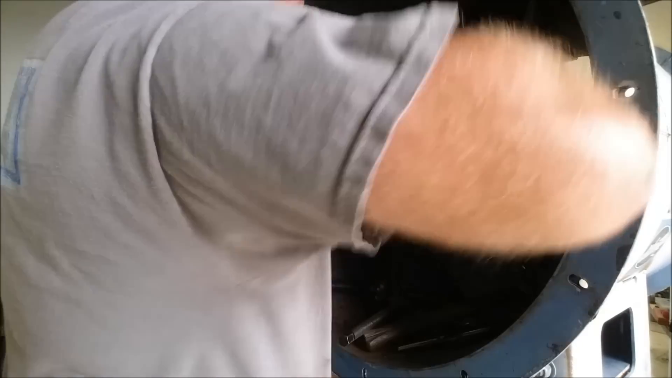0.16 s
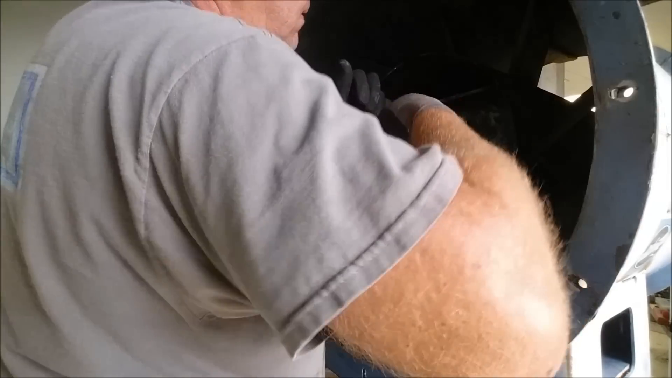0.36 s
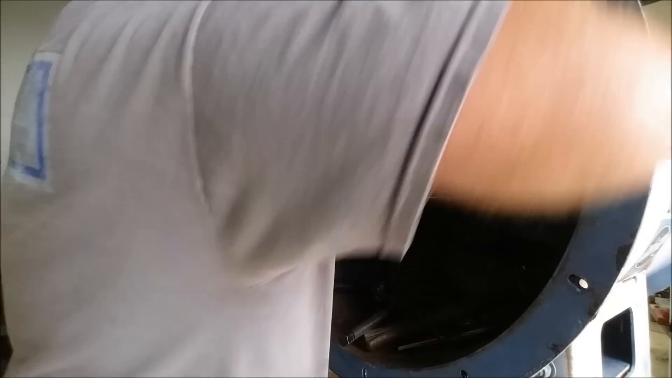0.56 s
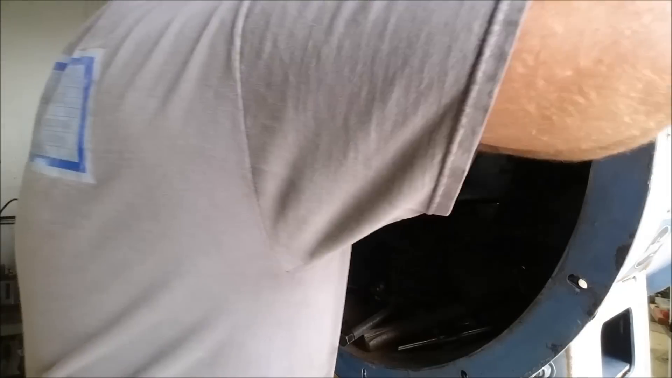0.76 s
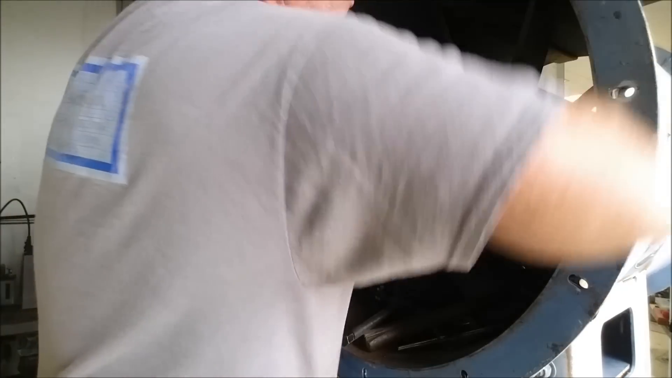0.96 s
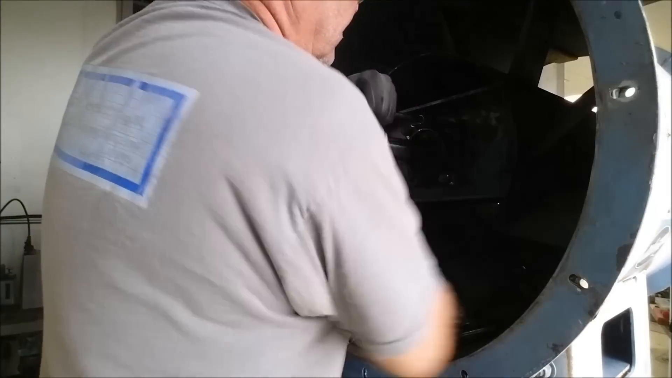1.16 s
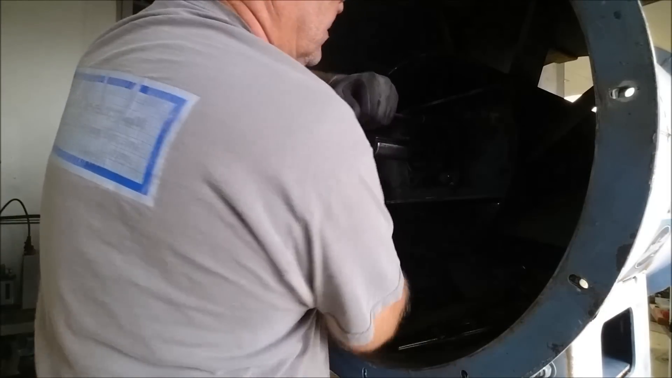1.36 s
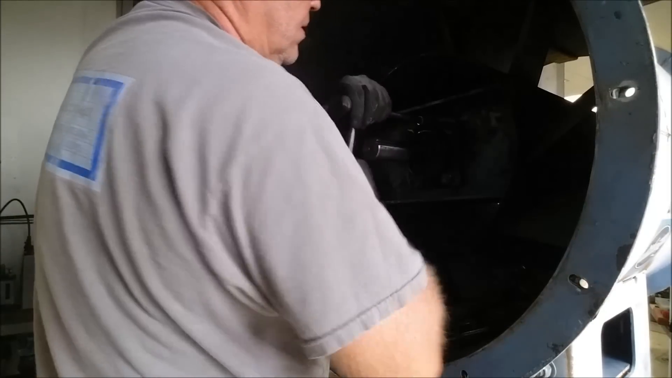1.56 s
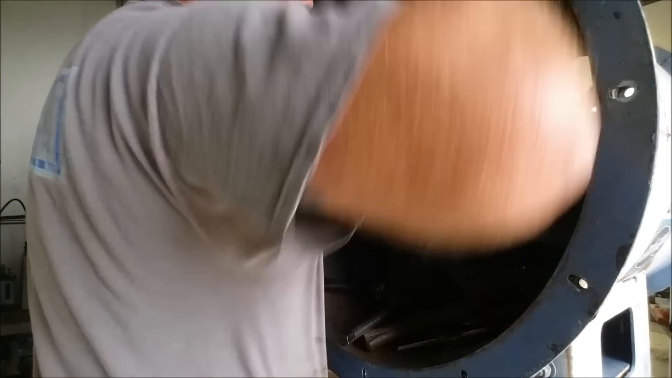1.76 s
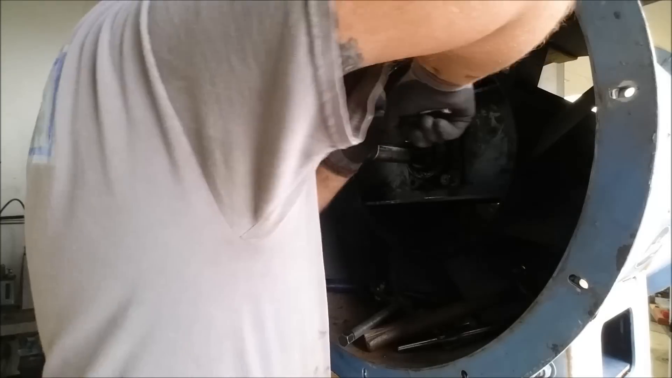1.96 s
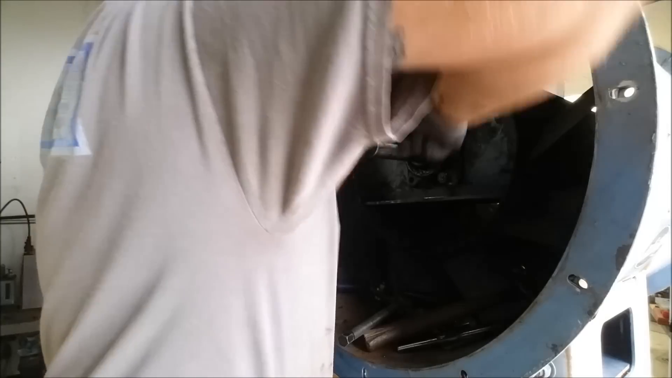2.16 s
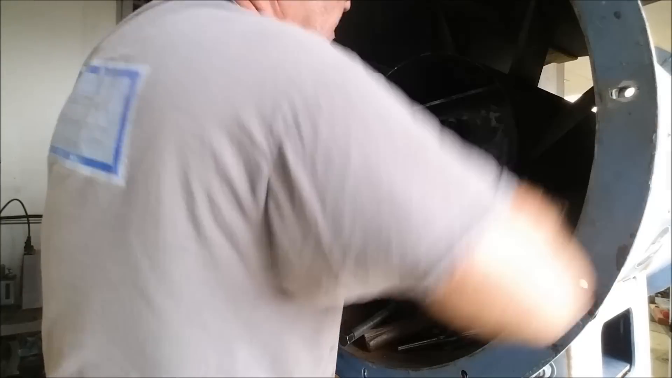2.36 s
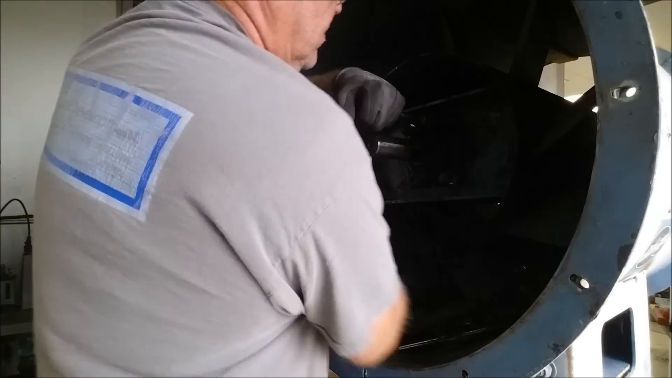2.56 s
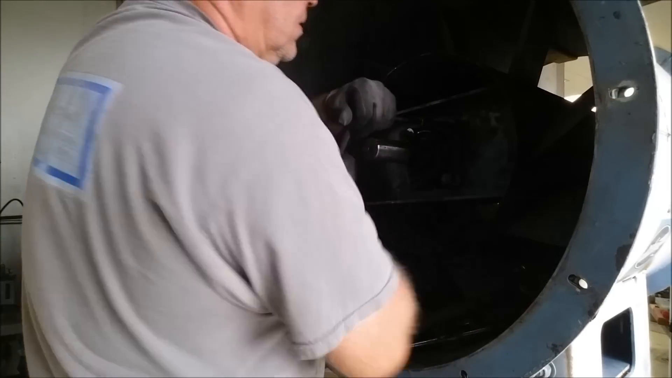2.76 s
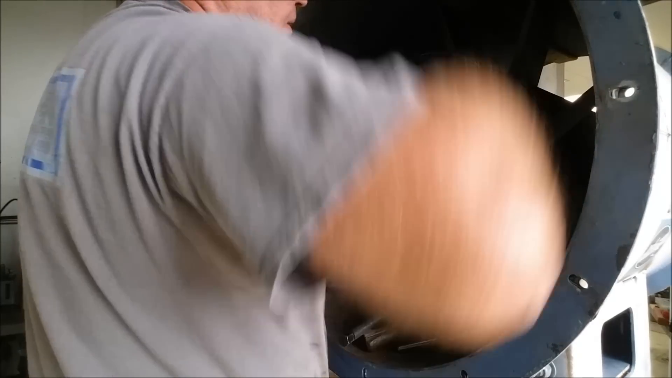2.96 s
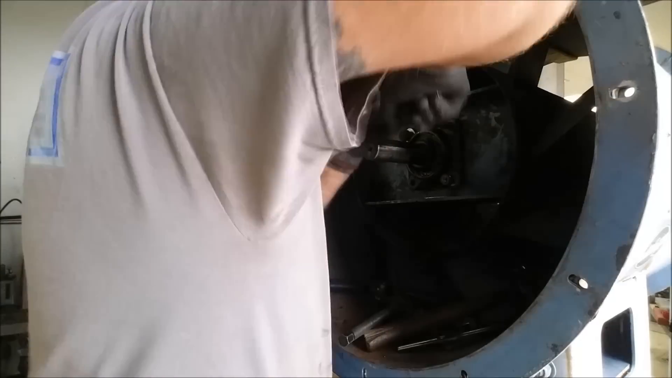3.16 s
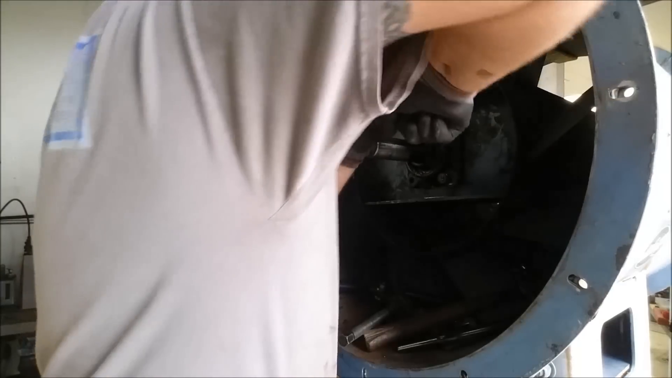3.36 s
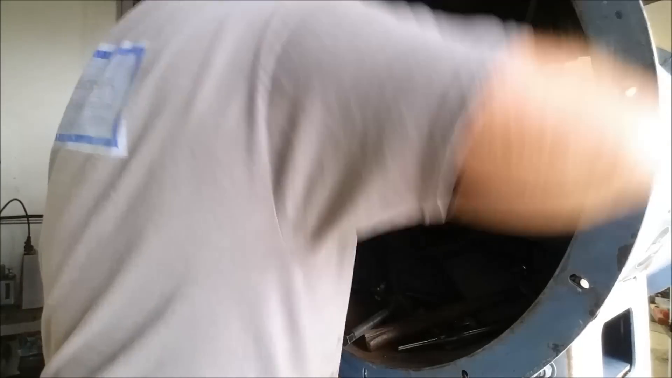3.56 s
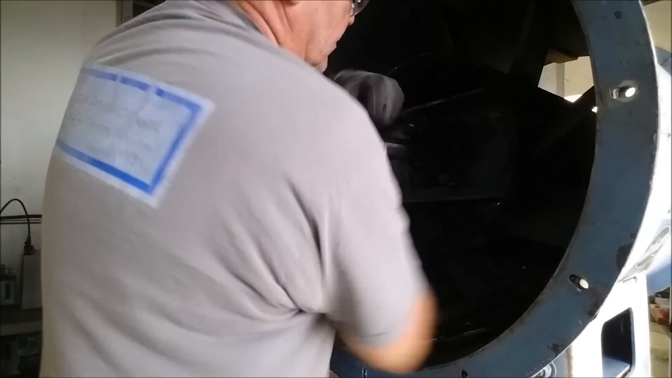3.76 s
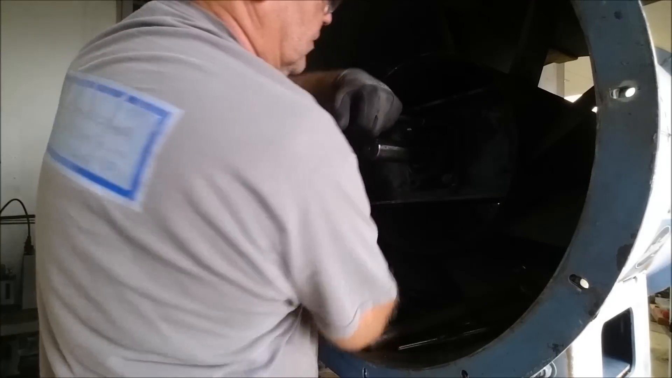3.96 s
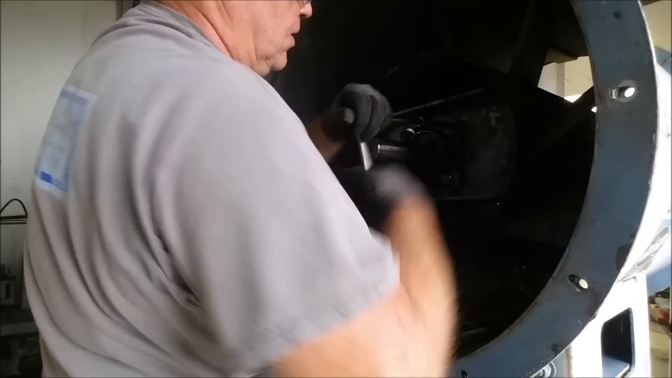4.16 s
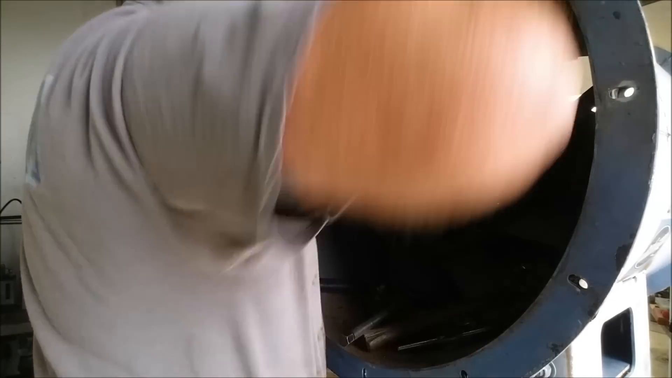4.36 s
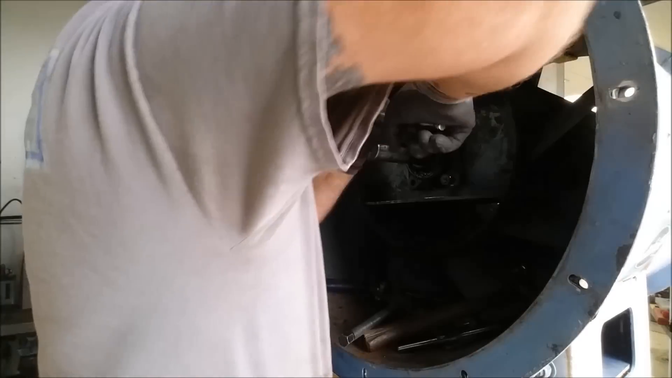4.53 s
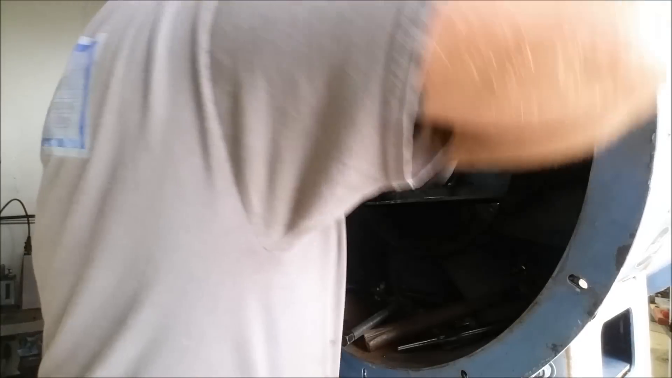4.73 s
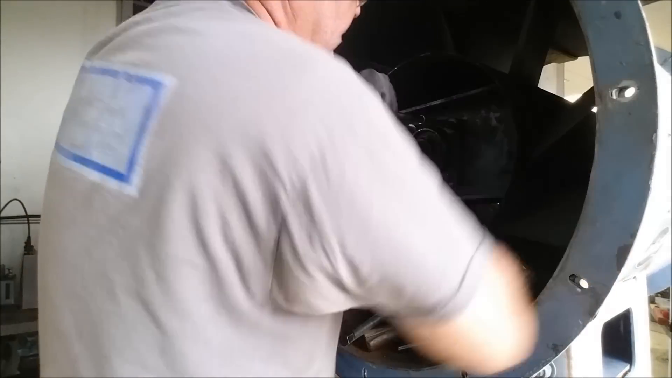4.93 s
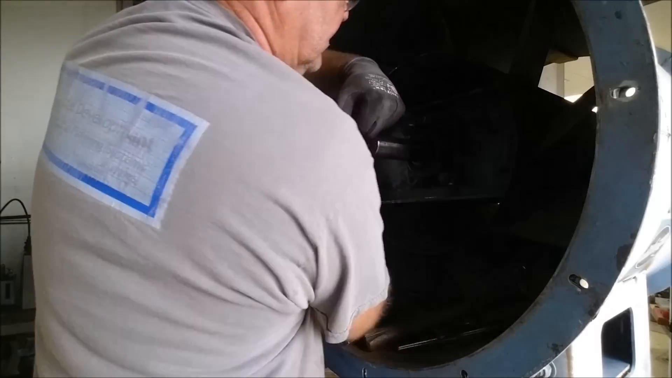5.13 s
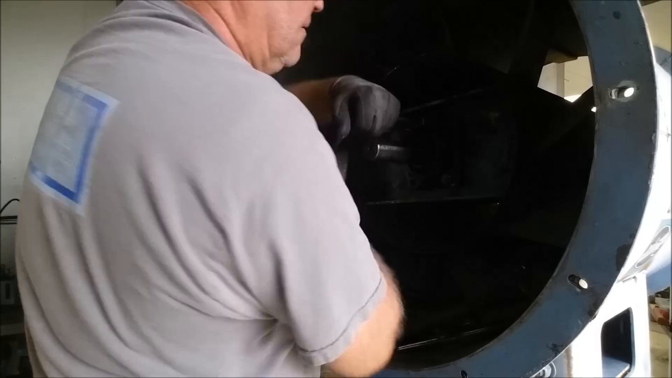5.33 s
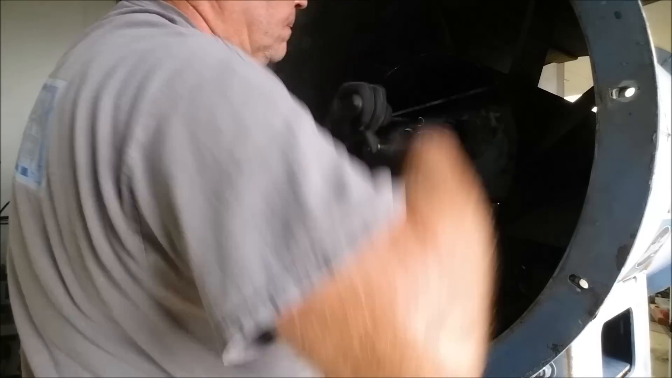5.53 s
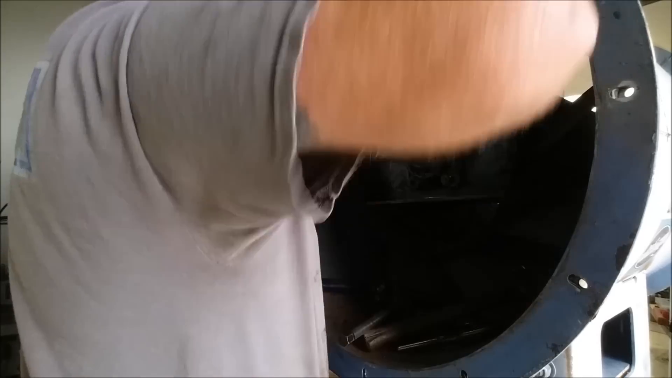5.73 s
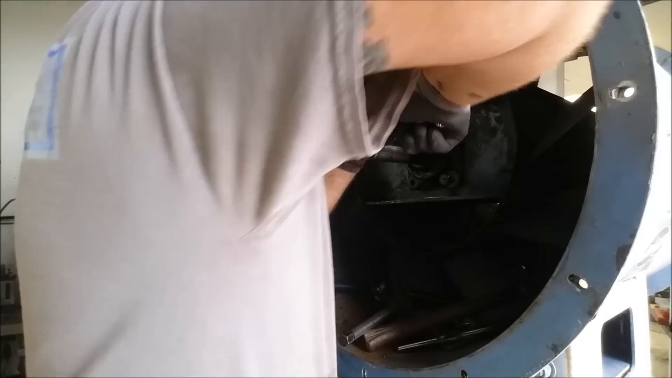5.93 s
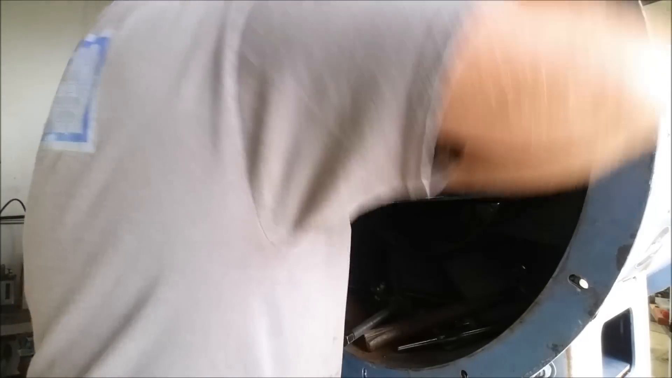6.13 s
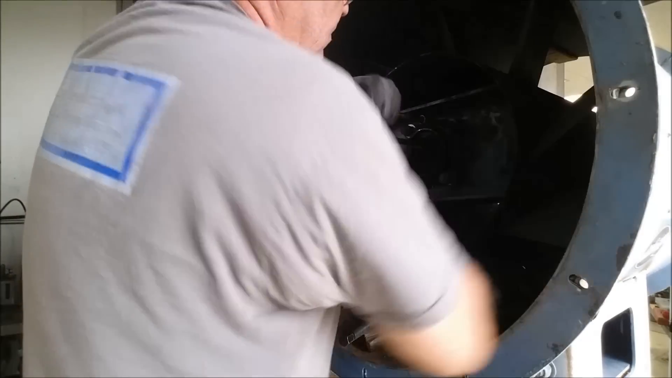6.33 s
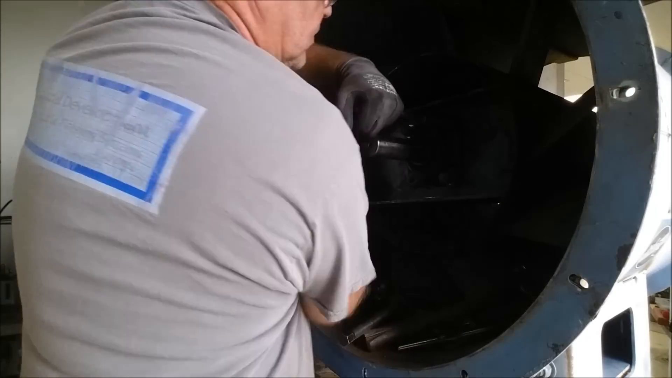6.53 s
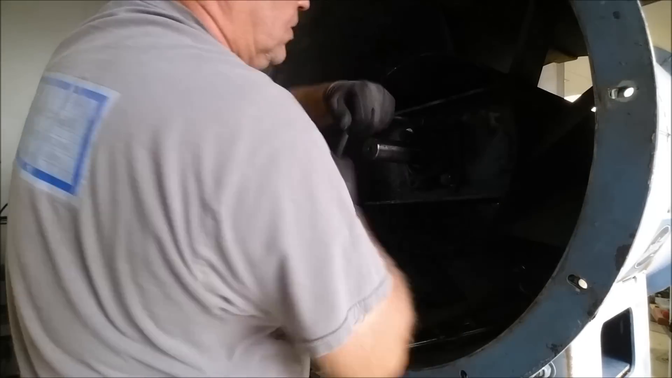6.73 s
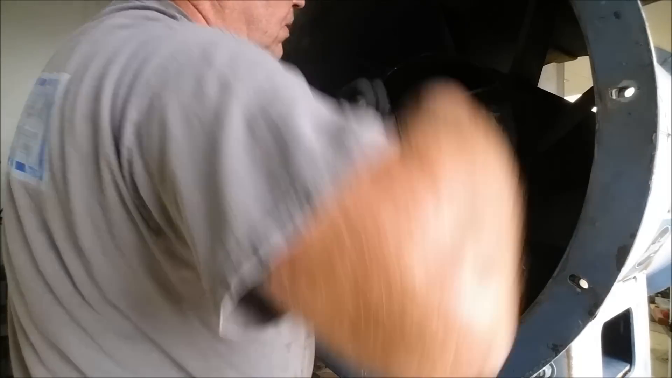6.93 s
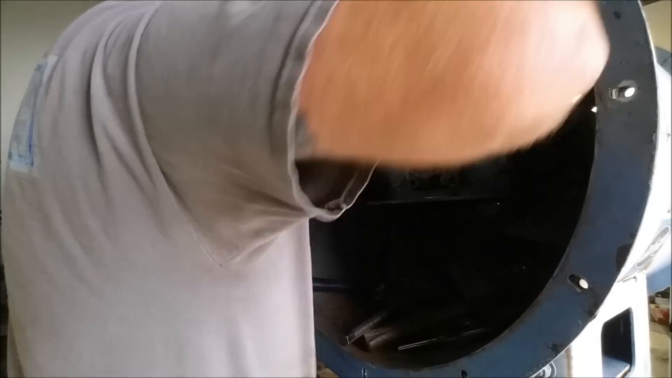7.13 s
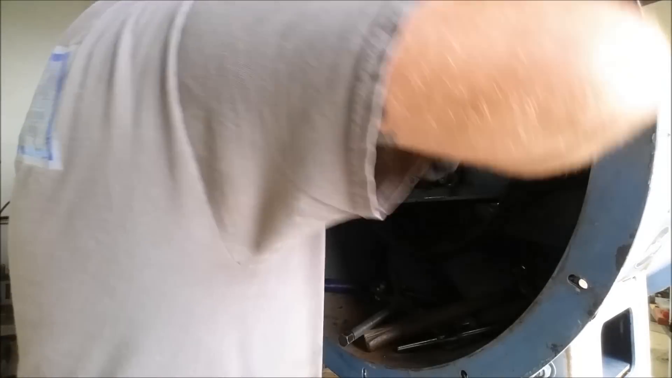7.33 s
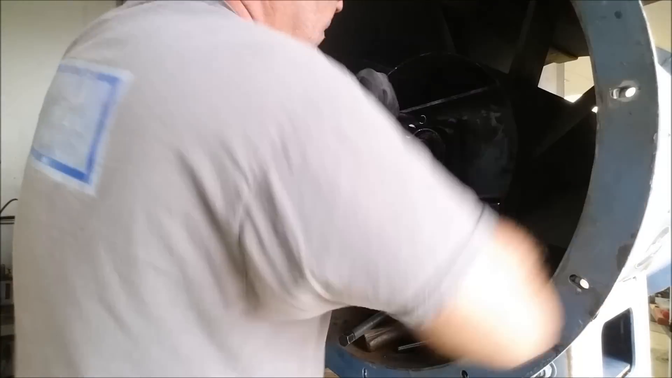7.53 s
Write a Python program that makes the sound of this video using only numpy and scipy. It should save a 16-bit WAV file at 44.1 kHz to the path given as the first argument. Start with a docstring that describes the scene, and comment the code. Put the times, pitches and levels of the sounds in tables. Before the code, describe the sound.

A ratchet wrench works in a hollow iron shell: grinding pulls, booming metallic knocks, then quick runs of bright clicks, over and over.

```python
"""In a workshop, inside a large hollow iron shell, a tap is worked into cast iron with a ratchet wrench.
At the ends of strokes the slack is taken up with knocks: noise bursts, shaped by the shell's modes, that boom and die.
Pulls grind as filtered noise of uneven level; on the return the pawl clicks over its teeth as resonated bursts.
The steel handle sings one thin high sine and the wrench head shimmers as narrow noise.
Low thuds, a rumble and steady room tone lie beneath."""
import sys
import numpy as np
from scipy import signal
from scipy.fft import rfft, irfft, next_fast_len
from scipy.io import wavfile
from scipy.ndimage import map_coordinates

SR = 44100
rng = np.random.default_rng(int(sys.argv[2]) if len(sys.argv) > 2 else 0)


def store_wav(level_fs):
    """Save 16-bit WAV to argv[1]."""
    pcm = np.round(np.clip(np.atleast_2d(level_fs), -1, 1) * 32767)
    wavfile.write(sys.argv[1], SR, pcm.T.astype(np.int16))


N = 339129

# Steady room tone: frequency_hz, relative_density_db (per Hz)
ROOM_SPECTRUM = [(15, -23), (25, -4), (127, -41), (161, -9), (384, -3), (451, -8.5), (3620, -22),
                 (3920, -17), (6560, -33.5), (16000, -43)]
# Low rumble: frequency_hz, relative_density_db (per Hz)
RUMBLE_SPECTRUM = [(20, -18), (50, -4), (72, 2.5), (90, 9), (105, -1), (150, 7.5), (190, -36)]
# Likeness of the two ports: frequency_hz, correlation (no unit)
PORT_LIKENESS = [(60, 0.91), (150, 0.95), (380, 0.96), (950, 0.43), (2380, 0.16), (5980, 0.074),
                 (15000, 0.01)]
# Tilt between the microphone ports: frequency_hz, left_minus_right_db
PORT_TILT = [(60, 1.5), (180, -0.5), (550, 0), (1650, -1.5), (4970, -1.5), (15000, 10)]
# Soft low notes: start_s, pitch_hz, level_db, length_s
LOW_THUDS = [(4.175, 88.4, -36.5, 0.13), (1.8, 80, -45, 0.069), (7.7, 95, -38, 0.088),
             (7.48, 83, -50.5, 0.069)]
# Ringings of the wrench head after some knocks: start_s, level_db, t60_s
HEAD_SHIMMERS = [(1.0, -44.5, 0.6), (2.275, -54, 0.51), (3.58, -34, 0.51), (4.12, -54, 0.55),
                 (5.423, -23.5, 0.6), (6.176, -41, 0.73)]
# Close modes of the wrench head: frequency_hz, width_hz, relative_level_db
HEAD_MODES = [(5050, 260, 0), (5510, 220, 1), (5680, 120, -9)]
# Moments that set the handle ringing: start_s, level_db, t60_s
HANDLE_RINGS = [(1.583, -34.5, 0.47), (2.862, -43, 0.82), (2.96, -45, 0.47), (3.59, -50, 0.73),
                (4.12, -59, .5), (4.845, -56, 0.73), (5.423, -46, .8), (5.66, -69, 0.59), (6.77, -62, .7),
                (7.0, -62, 0.9)]
# Pawl snapping over teeth: start_s, level_db, treble_db
TOOTH_CLICKS = [(0.0271, -32.5, -3), (0.0534, -31.5, -6), (0.0807, -31, -7), (0.1115, -32.5, -10),
                (0.174, -34, -6.5), (1.727, -33, -8), (1.7618, -28, -9), (1.7933, -29, -13),
                (1.8232, -28, -13), (1.8512, -29.5, -11), (1.8818, -30, -14), (1.932, -31.5, -10),
                (2.9686, -30.5, -4), (2.9994, -28, -8), (3.0283, -31, -7), (3.0614, -28, -12),
                (3.089, -27, -11.5), (3.1189, -28.5, -15), (3.1522, -33.5, -11), (3.2101, -34, -16),
                (4.223, -28, -13), (4.2542, -28.5, -12), (4.286, -27.5, -15), (4.315, -26.5, -13),
                (4.3432, -30.5, -4), (4.371, -31, -13), (4.3977, -30.5, -11), (4.4467, -32.5, -6.5),
                (5.5626, -25.5, -17), (5.6004, -29, -11), (5.6342, -28, -13), (5.6643, -28, -11),
                (5.691, -23, -19), (5.7224, -26.5, -15), (5.751, -30, -15.5), (5.7866, -34.5, -9),
                (6.9257, -29.5, -11), (6.9575, -31.5, -7), (6.993, -31.5, -7), (7.028, -24.5, -14),
                (7.0599, -29, -7), (7.0903, -31.5, -8), (7.1267, -32.5, -10)]
# Pawl seating just before a knock: start_s, level_db
PAWL_SEATINGS = [(4.096, -46), (5.395, -34), (6.726, -44)]
# Nominal pawl resonances, scattered afresh at each tooth: frequency_hz, width_hz, relative_level_db
PAWL_MODES = [(2650, 600, 5), (3160, 530, 4), (4330, 120, 17), (6240, 3100, 1), (8100, 520, 12.5),
              (10900, 3700, 1.5), (13100, 1000, 4)]
# The shell's answer to the pawl: frequency_hz, relative_density_db (per Hz)
PAWL_ANSWER_SPECTRUM = [(800, -11), (2200, 4), (3300, -4.5), (4300, 8), (5500, -1.5), (9000, -0.5),
                        (16000, -9.5)]
# Stretches of grinding (pulls, returns and brief load-ups before knocks):
# start_s, length_s, drone_db, groan_db, rasp_db
WRENCH_STROKES = [(0.0, 0.16, -57, -50.5, -47.5), (0.434, 0.12, -56, -55.5, -73),
                  (0.97, 0.024, -60, -49, -54), (1.115, 0.25, -46, -50, -44.5), (1.478, 0.1, -52, -54, -57),
                  (1.693, 0.38, -48.5, -45, -50), (2.344, 0.36, -45.5, -46, -41.5),
                  (2.986, 0.31, -56.5, -50, -46), (3.669, 0.27, -36, -43, -39.5),
                  (4.244, .36, -53.5, -48.5, -59), (4.952, 0.26, -45.5, -46.5, -43),
                  (5.544, 0.44, -57, -48.5, -49), (6.243, 0.37, -41.5, -45, -41.5),
                  (6.72, 0.032, -47, -45, -44.5), (6.843, 0.27, -61, -45.5, -48),
                  (7.207, 0.12, -56, -55, -64), (7.603, .3, -39.5, -45.5, -45)]
# Lowest shell modes under load: frequency_hz, width_hz, relative_level_db
DRONE_MODES = [(217.6, 6.3, -7), (251, 18, -17.5), (166.8, 8.8, -18)]
# Groan of the shell: frequency_hz, relative_density_db (per Hz)
GROAN_SPECTRUM = [(160, -52), (280, 5.5), (311, -9), (458, 4), (738, -34), (809, -7.5), (1500, -15.5),
                  (1950, -51), (3300, -120)]
# Peaks that stand on the groan: frequency_hz, width_hz, level_over_groan_db
GROAN_MODES = [(366, 18, -15), (501, 11, 12), (850, 80, 9), (955, 17, -5), (1324, 70, 6.5)]
# Rasp of the thread: frequency_hz, relative_density_db (per Hz)
RASP_SPECTRUM = [(590, -1), (1000, 2.5), (1100, -3), (1520, -2.5), (2450, -4), (2660, -10), (4160, -14.5),
                 (6230, -25.5), (12000, -42.5), (15600, -74), (22000, -120)]
# Knocks, coloured by where the blow lands: start_s, level_db, boom_db, clank_db, treble_db, decay_factor (no unit)
SHELL_KNOCKS = [(0.261, -43, 1.5, 0, -1.5, 0.59), (0.332, -29, -8.5, 1, 8, 0.75),
                (0.475, -43.5, 10.5, 12, 10.5, 0.77), (0.988, -37.5, 10, 7, 13, 0.82),
                (1.47, -56, 6, -11, -13, 0.76), (1.561, -23.5, 4.5, -8, -2.5, 0.99),
                (1.581, -20, 3, 4.5, 3, 0.77), (1.648, -33, 2, 8.5, 4, 0.78),
                (2.06, -45.5, 5.5, 7, 7.5, 0.72), (2.222, -29, 9, 2, -0.5, 0.92),
                (2.273, -18.5, -9.5, 0.5, 6, 0.87), (2.832, -31.5, -9, -6, -16, 1),
                (2.862, -11, -7.5, -5, -3, 1), (3.277, -38, -1, -11, -9, 0.9),
                (3.488, -23.5, 1, -6.5, -11, 0.97), (3.547, -37, 9, 13, 2, 0.78),
                (3.566, -33, 4, -1, 7, 0.6), (3.599, -33.5, -2, 9, 2, 0.5),
                (4.059, -42.5, 7, -2, -17, 0.47), (4.117, -9.5, -8, -4.5, -6, 1),
                (4.794, -24, -3.5, -10, -12.5, 0.91), (4.84, -21, -5.5, 4.5, 1, 0.83),
                (5.421, -14.5, -5.5, -4, 3.5, 1), (5.882, -40, -7, -12, -4, 0.64),
                (6.137, -29.5, 10.5, 0.5, -5.5, 0.49), (6.174, -23, -1, 3.5, 7, 0.77),
                (6.762, -21.5, 3, 4, 10.5, 0.9), (6.793, -17, -12, -2, -16, 0.72),
                (7.375, -52, 7.5, -14, -19, .6), (7.475, -37.5, 4.5, -4, -8, 1),
                (7.528, -38, 13, 3.5, 3, 0.78)]
# Clear shell modes, of varying strength: frequency_hz, width_hz, mean_level_over_dense_modes_db
SHELL_MODES = [(169, 11, 4), (215, 12, 9), (251, 14, 7), (342, 22, 5), (434, 12, 4), (465, 14, 4),
               (520, 14, 4), (618, 14, 6), (649, 12, 7), (682, 14, 7), (745, 14, 3), (825, 30, 7),
               (894, 16, 5), (935, 14, 4), (982, 12, 5), (1012, 14, 6), (1035, 20, 10), (1437, 18, 3),
               (1609, 12, 5), (1914, 16, 5), (2153, 16, 6), (2379, 22, 4), (2934, 40, 3), (3338, 40, 3),
               (3850, 60, 3), (5100, 90, 3), (5500, 120, 5)]
# Dense shell modes: frequency_hz, relative_density_db (per Hz)
SHELL_SPECTRUM = [(60, -56), (110, -11), (170, -9), (210, 1), (500, -9), (1040, -9.5), (1110, -11.5),
                  (2400, -13), (4100, -17), (5700, -26.5), (6200, -27.5), (8600, -33), (16000, -44.5)]
# Damping of the shell before each sound's decay factor: frequency_hz, t60_s
SHELL_DAMPING = [(150, 0.29), (400, 0.77), (1000, 0.63), (2500, 0.72), (5500, 0.67), (9000, 0.51),
                 (15000, 0.38)]

TOP_HZ = 16000  # band limit
LAG_S = 6e-5  # the right port hears this much later than the left
ROOM_DB, RUMBLE_DB = -61.5, -70.5  # the rumble at rest
JOLT_DB, JOLT_T60_S = -29.5, 0.44  # rumble relative to a knock's boom, and its decay
SHAKE_DB = -27  # rumble relative to the groan
HANDLE_HZ, HANDLE_RISE_S = 8438, .004
HANDLE_PHASE_RAD = 2.1  # between the ports: the note reaches them by different paths
SEATING_TREBLE_DB = -16
TOOTH_DETUNE, TOOTH_SCATTER_DB = .015, 2  # standard deviations; the detuning is a fraction of the frequency
MODE_GAP_HZ, MODE_WIDTH_HZ = 26.55, 7.5  # many lesser modes, mean spacing and width
STROKE_RISE_S, STROKE_FALL_S = 0.053, 0.17  # full ramp; time to fall 20 dB
STROKE_SAG_DB_PER_S = 6.5
IDLE_DRONE_DB, IDLE_GROAN_DB, IDLE_RASP_DB = -73, -72, -79.5  # beneath and between strokes
BOOM_HZ, BODY_HZ, CLANK_HZ, TREBLE_HZ = 260, 884, 1940, 4360  # where the colours act; the body stays at 0 dB
KNOCK_LEAD_S, KNOCK_RISE_S = .008, .012  # the load builds from this long before the listed time; full build-up


def amp(db):
    """Definition of the decibel: amplitude ratio from level."""
    return 10 ** (np.asarray(db) / 20)


def unit(x):
    """Normalisation of power: scales x to rms 1."""
    return x / np.sqrt(np.mean(x ** 2) + 1e-20)


def along(points, hz):
    """Linear interpolation of (Hz, value) points on a logarithmic frequency axis."""
    f, v = np.transpose(sorted(points))
    return np.interp(np.log(hz + 1), np.log(f + 1), v)


def wobble(rate):
    """Band-limited random fluctuation: a smooth curve through rate random knots a second."""
    knots = rng.standard_normal(int(N * rate / SR) + 4)
    return map_coordinates(knots, [np.arange(N) * rate / SR])


def filtered(x, response):
    """Linear filtering: the spectrum of x times a complex response of frequency."""
    n = x.shape[-1]
    m = next_fast_len(n + 8192)
    spectrum = rfft(x, m) * response(np.fft.rfftfreq(m, 1 / SR))
    return irfft(spectrum, m)[..., :n]


def peaks(rows, f):
    """Superposition of resonance curves: gain added by (Hz, width Hz, dB) peaks."""
    return sum(amp(db) / (1 + (2 * (f - c) / w) ** 2) for c, w, db in rows)


def resonances(rows):
    """Damped oscillators in parallel: causal response of (Hz, width Hz, dB) modes."""
    def response(f):
        total = 0
        for k, (c, w, db) in enumerate(rows):
            mode = 1j * f * w / (c * c - f * f + 1j * f * w)
            total = total + (-1) ** k * amp(db) * mode  # neighbours alternate in sign
        return total
    return response


def lesser_modes():
    """Modal density: gain of narrow modes scattered over frequency at random strengths, mean power 1."""
    hz = np.arange(SR // 2)
    present = rng.random(len(hz)) < 1 / MODE_GAP_HZ
    spikes = present * amp(1.9 * rng.standard_normal(len(hz)))
    curve = 1 / (1 + (2 * (hz[:201] - hz[100]) / MODE_WIDTH_HZ) ** 2)
    comb = unit(0.76 + np.convolve(spikes, curve, "same"))
    return lambda f: np.interp(f, hz, comb)


def stereo(pair, gain):
    """Partial coherence: two unrelated noises coloured and mixed to the likeness of the ports, rms 1."""
    turn = lambda hz: np.arccos(np.clip(along(PORT_LIKENESS, hz), -1, 1)) / 2
    mid, side = filtered(pair, lambda hz: gain(hz) * [np.cos(turn(hz)), np.sin(turn(hz))])
    return unit(np.array([mid + side, mid - side]))


def add(track, s, sound):
    """Superposition: mixes a sound in at time s."""
    part = track[:, round(s * SR):][:, :sound.shape[1]]
    part += sound[:, :part.shape[1]]


def dying(gain, stretch, length):
    """Frequency-dependent damping: stereo noise, rms 1 undamped, whose bands die at their own speeds."""
    noise = stereo(rng.standard_normal((2, length)), gain)
    hz, t, z = signal.stft(noise, SR, nperseg=256)
    t60 = stretch * along(SHELL_DAMPING, hz)[:, None]
    return signal.istft(z * amp(-60 * t / t60), SR, nperseg=256)[1][:, :length]


def struck(rows, rise):
    """Exponential decay: summed envelopes of (s, dB, t60 s) events with time constant rise in seconds."""
    t, total = np.arange(N) / SR, 0
    for s, db, t60 in rows:
        since = np.maximum(t - s, 0)
        total = total + amp(db - 60 * since / t60) * (1 - np.exp(-since / rise))
    return total


def effort():
    """Common load on the wrench: gains of drone, groan and rasp; each stroke sets in, sags and lets go."""
    t, gains = np.arange(N) / SR, amp([[IDLE_DRONE_DB], [IDLE_GROAN_DB], [IDLE_RASP_DB]])
    for s, length, *db in WRENCH_STROKES:
        onset = np.clip((t - s) / STROKE_RISE_S + .5, 0, 1)  # half-way up at the start time
        release = amp(-20 * np.maximum(t - s - length, 0) / STROKE_FALL_S)
        sag = amp(-STROKE_SAG_DB_PER_S * np.maximum(t - s, 0))
        gains = gains + amp(db)[:, None] * onset * release * sag
    return gains


def workshop():
    """Stationary noise and forced vibration: room tone, and a rumble that knocks jolt and strokes shake."""
    tone = stereo(rng.standard_normal((2, N)), lambda f: amp(along(ROOM_SPECTRUM, f)))
    rumble = stereo(rng.standard_normal((2, N)), lambda f: amp(along(RUMBLE_SPECTRUM, f)))
    jolt_rows = [(s, db + boom_db + JOLT_DB, JOLT_T60_S) for s, db, boom_db, *_ in SHELL_KNOCKS]
    jolts = struck(jolt_rows, rise=0.007)
    shaking = amp(SHAKE_DB) * effort()[1]
    return amp(ROOM_DB) * tone + (amp(RUMBLE_DB) + jolts + shaking) * rumble


def thuds():
    """Windowed pure tones: a few low notes swell and fade under half a sine."""
    out = np.zeros((2, N))
    for s, hz, db, length in LOW_THUDS:
        t = np.arange(round(length * SR)) / SR
        swell = np.sin(np.pi * t / length)
        add(out, s, amp(db) * swell * np.sin(2 * np.pi * hz * t) * np.ones((2, 1)))
    return out


def shimmer():
    """Closely spaced resonances: noise in the wrench head's modes, dying after some knocks."""
    noise = amp(1.1 * wobble(30)) * rng.standard_normal((2, N))
    ring = stereo(noise, lambda f: peaks(HEAD_MODES, f))
    return struck(HEAD_SHIMMERS, rise=0.0049) * ring


def handle():
    """Single-mode vibration: the steel handle sings; pitch and level waver a little as the hand shakes it."""
    phase = 2 * np.pi * np.cumsum(HANDLE_HZ + 4 * wobble(25)) / SR
    ports = []
    for side in (0, 1):
        level = amp(1.5 * wobble(30))
        ports.append(level * np.sin(phase + side * HANDLE_PHASE_RAD + .4 * wobble(6)))
    return struck(HANDLE_RINGS, HANDLE_RISE_S) * amp(2 * wobble(30)) * np.array(ports)


def ratchet():
    """Impulse excitation: the pawl snaps, a crack of a few ms excites its modes, and the shell answers."""
    out, t = np.zeros((2, N)), np.arange(SR // 2) / SR
    seatings = [(s, db, SEATING_TREBLE_DB) for s, db in PAWL_SEATINGS]
    for s, db, treble_db in list(TOOTH_CLICKS) + seatings:
        scatter = rng.standard_normal((len(PAWL_MODES), 2))  # each tooth differs a little
        tooth = [(c * (1 + TOOTH_DETUNE * a), w, level + TOOTH_SCATTER_DB * b)
                 for (c, w, level), (a, b) in zip(PAWL_MODES, scatter)]
        bright = lambda f: amp(along([(5500, 0), (7000, treble_db)], f))
        burst = rng.standard_normal((2, len(t))) * np.exp(-(t / 0.0017) ** 2)
        crack = filtered(burst, lambda f: resonances(tooth)(f) * bright(f))
        crack[1] = 1.5 * crack[1] + 0.29 * crack[0]  # stronger on the right, partly shared
        crack /= np.abs(crack.mean(axis=0)).max()
        answer = dying(lambda f: amp(along(PAWL_ANSWER_SPECTRUM, f)) * bright(f), 0.91, len(t))
        answer *= 1 - np.exp(-t / 0.00061)
        early = 1 + 2.9 * amp(-60 * t / 0.051)  # the answer is strongest at first
        add(out, s, amp(db) * (crack + amp(-20.0) * answer * early))
    return out


def cutting():
    """Random excitation of modes: chips tear off in uneven grains; the shell drones and groans, the thread rasps."""
    drone_gain, groan_gain, rasp_gain = effort()
    grains = lambda depth_db, rate: amp(depth_db * wobble(rate)) * rng.standard_normal((2, N))
    lesser = lesser_modes()
    groan_colour = lambda f: amp(along(GROAN_SPECTRUM, f)) * (lesser(f) + peaks(GROAN_MODES, f))
    drone = stereo(grains(4, 22), lambda f: peaks(DRONE_MODES, f))
    groan = stereo(grains(1.85, 25), groan_colour)
    rasp = stereo(grains(3, 45), lambda f: amp(along(RASP_SPECTRUM, f)) * lesser(f))
    return drone_gain * drone + groan_gain * groan + rasp_gain * rasp


def knocks():
    """Modal excitation by impact: clear modes sound at new strengths over a freshly scattered set of lesser ones."""
    out, t, grid = np.zeros((2, N)), np.arange(SR) / SR, np.arange(20, TOP_HZ, 5.0)
    power = lambda gain: np.sum(gain(grid) ** 2)
    for s, db, boom_db, clank_db, treble_db, stretch in SHELL_KNOCKS:
        strengths = rng.standard_normal(len(SHELL_MODES))
        woken = [(c, w, level + 2.5 * r) for (c, w, level), r in zip(SHELL_MODES, strengths)]
        lesser = lesser_modes()
        plain = lambda f: amp(along(SHELL_SPECTRUM, f)) * (lesser(f) + peaks(woken, f))
        blow = [(BOOM_HZ, boom_db), (BODY_HZ, 0), (CLANK_HZ, clank_db), (TREBLE_HZ, treble_db)]
        landed = lambda f: plain(f) * amp(along(blow, f))
        # the colours change the power of the knock as well as its timbre
        boom = dying(landed, max(stretch, .15), SR) * np.sqrt(power(landed) / power(plain))
        onset = np.sin(np.pi / 2 * np.minimum(t / KNOCK_RISE_S, 1)) ** 2
        boom *= onset * (1 + 0.083 * amp(-60 * t / 0.17))
        # metal meets metal: extra treble that dies quickly
        treble = filtered(boom[:, :SR // 8], lambda f: f ** 2 / (f ** 2 + 5000 ** 2))
        crack = 3.3 * treble * amp(-60 * t[:SR // 8] / 0.043)
        add(out, s - KNOCK_LEAD_S, amp(db) * boom)
        add(out, s - KNOCK_LEAD_S, amp(db - 3.5) * crack)
    return out


def scene():
    """Radiation cutoff and superposition: the shell radiates little below its lowest modes; all sources add."""
    iron = filtered(knocks() + cutting(), lambda f: f ** 4 / (f ** 4 + 95 ** 4))
    return workshop() + thuds() + shimmer() + handle() + ratchet() + iron


def record(dry):
    """Time and level differences: the two ports differ in arrival time and tilt; the band ends at TOP_HZ."""
    half = np.array([[.5], [-.5]])  # each port takes half the difference
    ports = lambda hz: amp(along(PORT_TILT, hz) * half) * np.exp(2j * np.pi * hz * LAG_S * half)
    return filtered(dry, lambda hz: ports(hz) * (hz < TOP_HZ))


dry = scene()
out = record(dry)
store_wav(out)
```